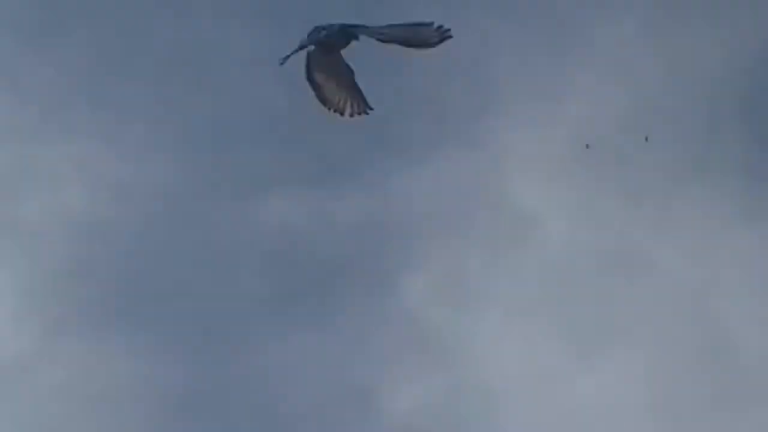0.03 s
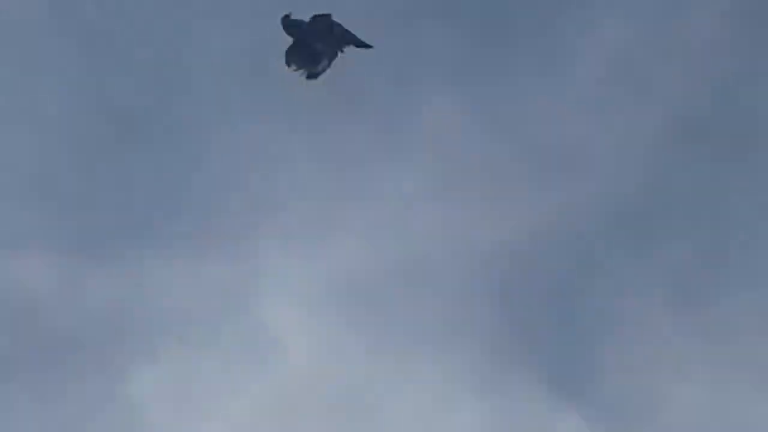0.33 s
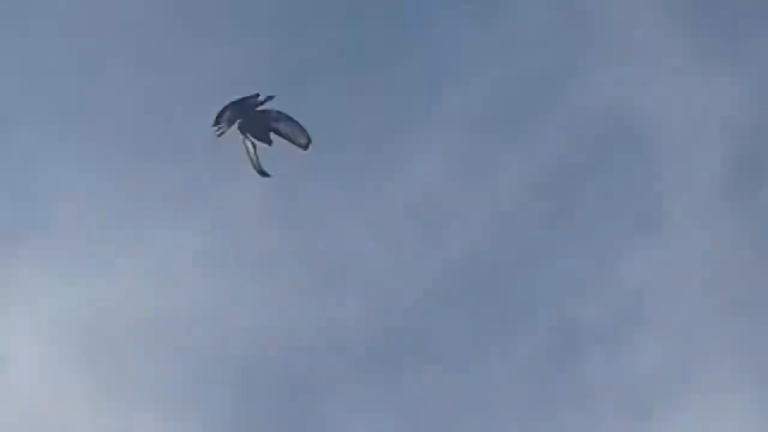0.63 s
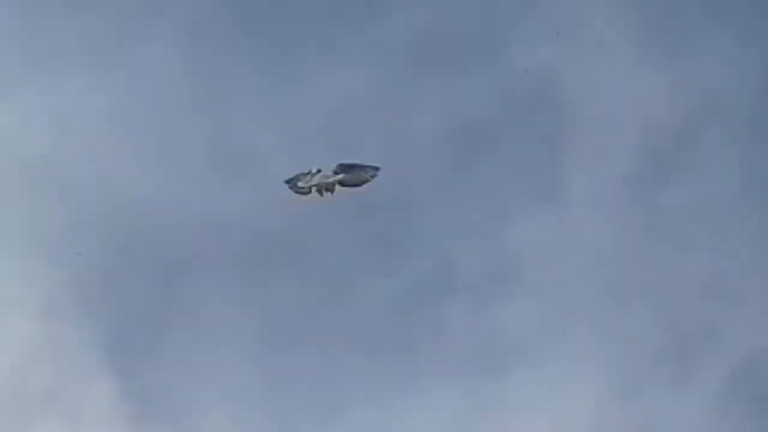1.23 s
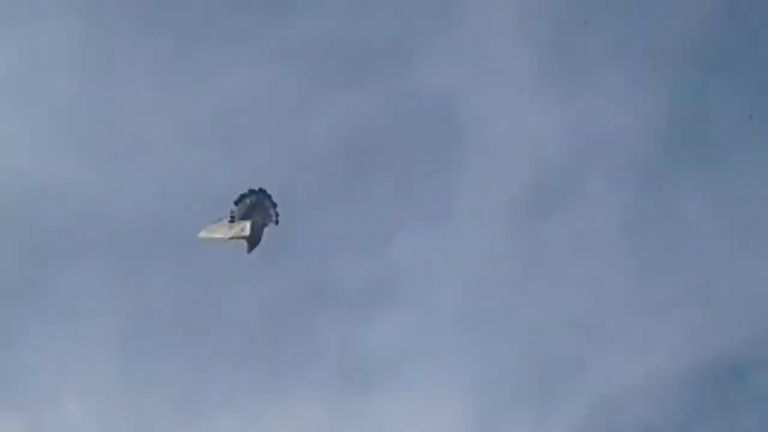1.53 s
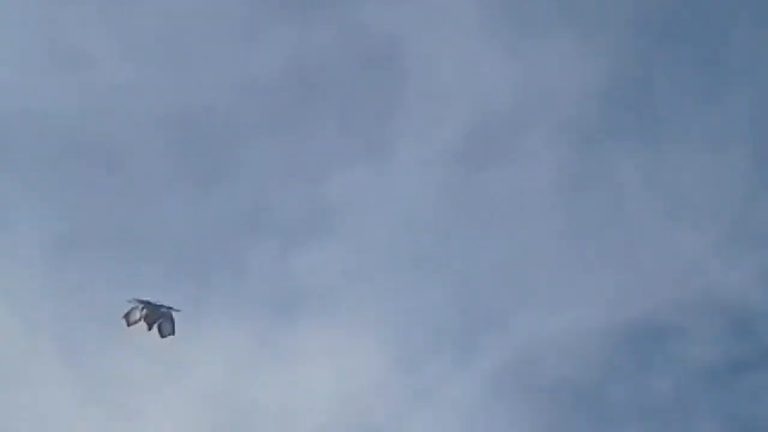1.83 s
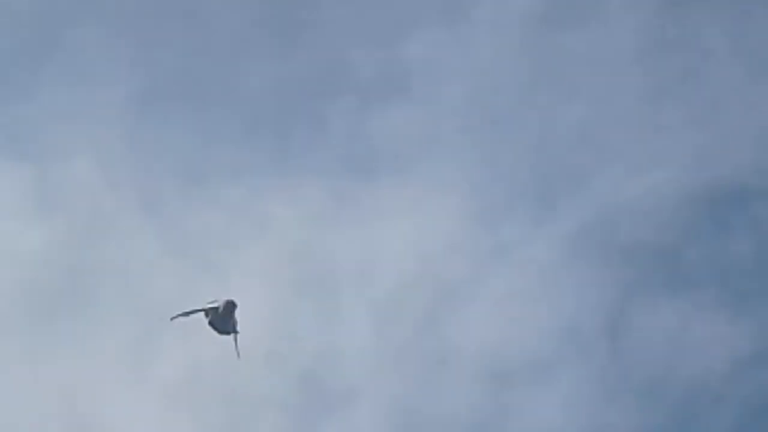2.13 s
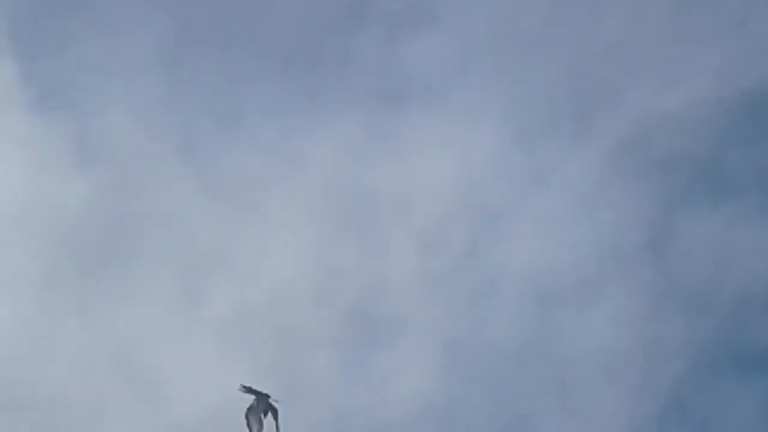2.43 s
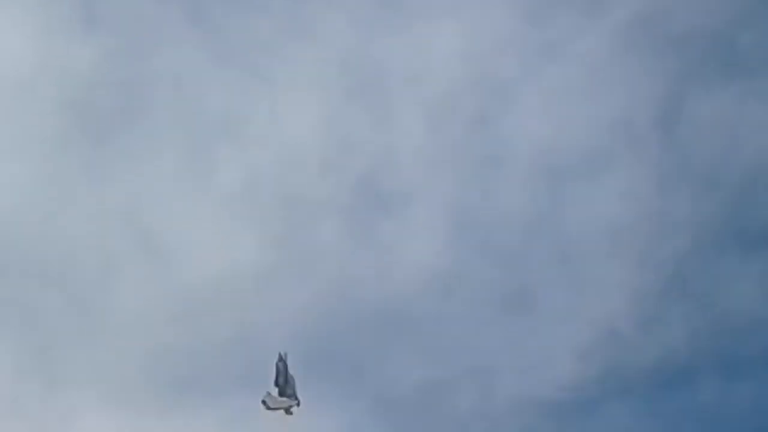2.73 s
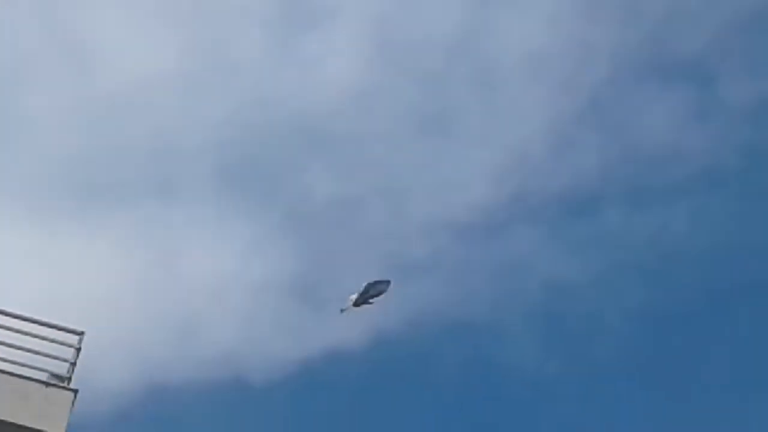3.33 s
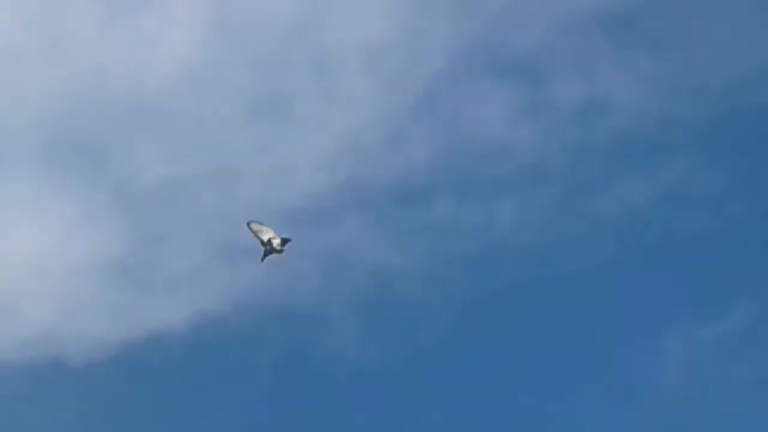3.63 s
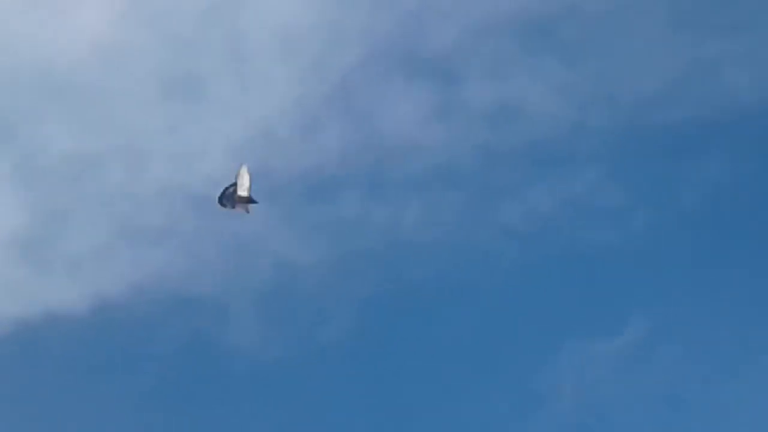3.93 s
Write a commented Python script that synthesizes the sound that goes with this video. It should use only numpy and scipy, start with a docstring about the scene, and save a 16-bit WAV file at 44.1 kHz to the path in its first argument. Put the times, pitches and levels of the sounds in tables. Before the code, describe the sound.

A pigeon flies overhead, its wings swishing and clapping sharply about eight times a second, echoing lightly off yard walls. The claps drop out around 1.5 seconds and again from 2.2 to 2.7, then continue softer until 3.8. Small birds chirp further off, clearest near 0.5, 2 and 2.8 seconds. Underneath are a few soft bumps, a steady hiss and a faint hum that swells from about 3 seconds.

```python
"""Pigeon over a yard

A pigeon passes above the microphone: its wings swish on each stroke and clap at the top of most.
Every clap comes back off the ground and a wall, and a few return from farther walls as faint ticks.
Small birds chirp further off, over a steady outdoor hum and hiss; the hum swells near the end.
A few soft bumps and faint low tones lie underneath."""
import sys
import numpy as np
from scipy import signal
from scipy.fft import rfft, irfft, next_fast_len
from scipy.io import wavfile
from scipy.ndimage import map_coordinates

SR = 44100
rng = np.random.default_rng(int(sys.argv[2]) if len(sys.argv) > 2 else 0)


def wav_record(signal):
    """Record a signal, one row per channel, as 16-bit PCM in the file named by sys.argv[1]."""
    frames = np.transpose(np.atleast_2d(signal))
    bounded = np.clip(frames, -1, 1)
    # unit amplitude maps onto the largest positive 16-bit level
    quanta = np.round(bounded * 32767).astype(np.int16)
    wavfile.write(sys.argv[1], SR, quanta)


N = 4 * SR

# Background level at the microphone: t/s, level/dB
HUM_LEVEL = [(0.0, -59.5), (0.69, -58.5), (0.98, -57), (2.76, -57.5), (2.97, -49.5), (3.66, -47.5),
             (4.0, -47)]
HISS_LEVEL = [(0, -46.5), (.2, -53), (.5, -45.5), (1.0, -44.5), (1.45, -45), (1.7, -47), (2.3, -44),
              (2.56, -48), (3.0, -43), (3.5, -44), (4, -43.5)]
# Background spectra: f/Hz, relative level/dB
HUM_SPECTRUM = [(24, -43), (40, -26), (152, -6.5), (226, -21.5), (302, -2.5), (496, -6), (531, -3),
                (816, 0), (1320, -9), (1560, -5), (2400, -13.5), (3120, -13), (5280, -120)]
HISS_SPECTRUM = [(880,-53), (1500,-21), (2300,-10), (2880,-3), (3600,4.5), (4500,3.5), (5300,1.5), (7170,2),
                 (8740,-18), (16000,-30)]
RUMBLE_SPECTRUM = [(20, -15), (45, -12), (85, -1), (150, -0.5), (260, -2), (600, -23)]
# Soft bumps: centre t/s, middle f/Hz, length/s, level/dB
BUMPS = [(0.476, 125, 0.022, -48.5), (1.48, 153, .05, -51), (1.559, 335, 0.026, -43),
         (2.151, 121.3, 0.042, -42.5)]
# Faint far tones: t/s, length/s, first f/Hz, middle f/Hz, last f/Hz, level/dB
FAR_TONES = [(.53, 0.15, 196, 178.6, 145, -58.5), (.8, 0.17, 156, 176.8, 161, -52.5),
             (1.63, 0.25, 165, 172.5, 148, -57.5), (2.82, 0.67, 502, 500, 492, -56.5)]

# Reverberation time of the yard: f/Hz, T60/s
YARD_T60 = [(200, 0.15), (1500, 0.5), (4000, 0.75), (7000, 0.47), (10000, 0.39), (16000, 0.085)]
# Tone of the echoes off yard, ground and wall: f/Hz, gain/dB
YARD_COLOUR = [(100, -33), (1500, 10), (3800, 0), (5500, 2.5), (7200, 10), (9000, 10), (16000, -2)]
GROUND_COLOUR = [(100, 0), (1500, 2.5), (3600, -0.5), (4500, -4.5), (6000, -4), (7050, 7.5), (8300, 8.5),
                 (10000, 6), (15000, 2.5)]
WALL_COLOUR = [(100, -12), (1500, 9), (4000, 6.5), (7200, 2), (9000, -1.5), (15000, 2)]
# Delay of the ground echo as the pigeon passes: t/s, lag/s
GROUND_LAG = [(1.3, 0.0091), (1.86, 0.0079), (2.16, .008), (3.35, .0065)]

# Small birds' notes: t/s, length/s, first f/Hz, middle f/Hz, last f/Hz, level/dB
CHIRPS = [(.44,0.029,3840,4310,4770,-40.5), (.443,.036,5710,6500,7260,-41), (.474,0.063,2757,4085,4380,-34),
          (0.513,.056,4610,3883,3200,-28), (1.305,.05,5700,5040,4150,-41),
          (1.589,.036,4605,3800,2830,-40.5), (1.735,0.049,4690,4450,4100,-39),
          (1.783,0.049,4020,3630,3340,-43), (1.914,.045,4220,4950,5340,-33.5),
          (1.934,.045,2730,3110,3500,-38.5), (1.966,0.0278,3230,3490,4040,-24.5),
          (1.984,0.035,4010,4056,3870,-17.5), (2.01,.06,4044,3585,2860,-27),
          (2.236,0.029,4900,5090,5500,-32.5), (2.263,0.03,4890,5330,5560,-32.5),
          (2.287,0.0356,3680,4410,3940,-40), (2.367,.032,4210,3710,3220,-34.5),
          (2.611,.04,4350,4560,3800,-42.5), (2.765,0.028,4300,3800,3400,-36),
          (2.797,0.028,2640,2247,1770,-38), (2.83,0.033,4206,4020,3920,-22),
          (2.87,.05,3664,3385,2930,-27.5), (3.108,0.073,3490,3925,3300,-39.5),
          (3.943,0.025,4660,4910,4800,-35)]
# Second harmonic of a rising note: f/Hz, relative level/dB
CHIRP_OVERTONE = [(6000, -12), (7400, -16.5), (9000, -23.5), (10000, -37)]
# A chirp's bounce off the ground, then the wall: lag/s, gain/dB
CHIRP_ECHOES = [(.009, -6), (.03, -7.5)]

# Wing swishes overhead, and faint ticks of claps returning from farther walls (the rows at 1.361,
# 1.491, 2.199 and 2.233 s): peak t/s, relative puff level/dB, hiss level/dB
SWISHES_AND_TICKS = [(.055, -45.5, -47), (0.168, -49.5, -46), (.245, -51.5, -53), (.295, -46, -54),
                     (0.364, -42.5, -59), (0.606, -46.5, -58), (0.663, -42.5, -43), (0.716, -47.5, -52),
                     (0.769, -43.5, -44), (0.834, -48.5, -41), (0.888, -41.5, -38), (0.944, -44, -38),
                     (0.998, -43, -48), (1.064, -47, -40.5), (1.121, -43.5, -44), (1.179, -44.5, -39),
                     (1.244, -41.5, -44), (1.304, -48, -38), (1.361, -48, -42), (1.418, -45, -37),
                     (1.491, -57, -35.5), (1.555, -52.5, -43.5), (1.611, -51.5, -44), (1.736, -47.5, -45),
                     (1.796, -47.5, -42), (1.851, -46, -47), (1.916, -50.5, -41), (1.974, -46, -37),
                     (2.033, -49.5, -38.5), (2.09, -44, -43), (2.156, -43, -53), (2.199, -52, -37.5),
                     (2.233, -56, -35), (2.35, -60, -44), (2.417, -47, -42.5), (2.479, -53.5, -46.5),
                     (2.76, -58, -41.5), (2.814, -51, -35.5), (2.87, -41.5, -32), (3.384, -64, -35),
                     (3.658, -48, -37.5), (3.772, -48, -37)]
# Spectra of their air puff and feather hiss: f/Hz, relative level/dB
PUFF_SPECTRUM = [(40, -29), (110, -19.5), (220, -5), (450, -7.5), (650, -4), (900, 1), (1250, -4.5),
                 (1700, -12), (3000, -6), (8000, -27)]
FEATHER_SPECTRUM = [(500, -38), (2400, -12), (3800, 4), (5500, 1.5), (7200, 6), (8500, -11.5),
                    (11000, -24.5), (16000, -27)]
# Wing claps overhead: t/s, relative level/dB, time the feathers take to meet/s,
# treble tilt/(dB per octave), ground echo gain/dB, wall echo gain/dB, air thump level/dB
CLAPS = [(0.0597,-16.5,0.0068,-1.5,-4.5,-9,-60), (0.1813,-5.5,0.00029,0.6,-6,-12,-53),
         (.306,-8.5,0.00035,0,-1,-12.5,-53), (.37,-7,0.00028,0,-4,-18,-41.5),
         (0.6709,-16.5,0.0011,-1,-12,-16.5,-48), (0.7807,-14,.002,1,-9.5,-17,-51),
         (0.8945,-6.5,.0025,0,-5,-24,-43), (1.0114,-8.5,0.00093,.3,-7.5,-22,-51),
         (1.13,-8,0.0019,0.9,-5.5,-30,-47.5), (1.2506,-5.5,0.0032,0.5,-6,-20,-49),
         (1.3724,-4.5,.002,-1.5,-5.5,-26,-49), (1.4378,-10,0.00065,-5,-6,-22,-44.5),
         (1.8566,-11.5,.0018,2.8,-5,-26,-48), (1.9773,-19.5,.001,3.5,-12,-20,-46.5),
         (2.0968,-9,0.0019,2,-14,-16,-47), (2.162,-10.5,0.00078,-3,-7,-12.5,-50),
         (2.7225,-22.5,.0017,0.5,-10,-14,-64), (2.848,-10.5,.003,-3.5,-8,-14,-45),
         (2.9844,-18.5,.0019,0,-8.5,-10.5,-53), (3.1102,-20,.001,-1,-7,-8,-53),
         (3.2331,-22,.0026,4,-8,-11.5,-48), (3.3522,-11,.0024,-3.5,-3,-23,-51),
         (3.4792,-13.5,0.0017,-3,-6,-19,-62), (3.606,-14.5,.0017,-1.5,-5.5,-24,-40.5),
         (3.7339,-14,0.0019,-2.5,-6,-27,-60), (3.8012,-10,0.00093,-4.5,-7,-27,-52)]
# Spectra of a clap and of the thin shimmer after it: f/Hz, relative level/dB
CLAP_SPECTRUM = [(40, -62), (120, -29), (400, -21.5), (900, -17.5), (1600, -18), (2600, -12.5), (3900, 1.5),
                 (5200, 0), (6300, -2.5), (7200, 2), (8300, -15), (10000, -21.5), (13000, -24),
                 (16000, -23)]
SHIMMER_SPECTRUM = [(5000, -22), (9500, -6), (11500, 10), (16000, -6)]


def amp(db):
    """Decibels to gain."""
    return 10 ** (np.asarray(db) / 20)


def unit_rms(x):
    """Scale to rms 1."""
    return x / np.sqrt(np.mean(x ** 2) + 1e-20)


def unit_energy(x):
    """Scale to total energy 1."""
    return x / np.linalg.norm(x)


def at_hz(points, hz):
    """Read (f/Hz, value) points on a log frequency axis."""
    f, values = np.transpose(points)
    return np.interp(np.log(hz + 1), np.log(f + 1), values)


def curve(points):
    """Spread (t/s, value) points to one value per sample."""
    return np.interp(np.arange(N) / SR, *np.transpose(points))


def wobble(rate):
    """A smooth random curve, rate knots a second."""
    return map_coordinates(rng.standard_normal(int(N * rate / SR) + 4), [np.arange(N) * rate / SR])


def filtered(x, response):
    """Filter x by a gain given as a function of frequency."""
    size = next_fast_len(N + SR // 2)
    return irfft(rfft(x, size) * response(np.fft.rfftfreq(size, 1 / SR)), size)[:N]


def noise(spectrum):
    """Coloured noise of rms 1."""
    return unit_rms(filtered(rng.standard_normal(N), lambda hz: amp(at_hz(spectrum, hz))))


def colour(x, points, tilt_db=0, size=2048):
    """Causal filter through (f/Hz, gain/dB) points, with a tilt per octave in the treble."""
    hz = np.fft.rfftfreq(size, 1 / SR)
    db = at_hz(points, hz) + tilt_db * np.log2(np.maximum(hz, 1000) / 4000)
    cepstrum = irfft(np.log(amp(db)))
    cepstrum[1:size // 2] *= 2  # fold to minimum phase
    cepstrum[size // 2 + 1:] = 0
    return signal.fftconvolve(x, irfft(np.exp(rfft(cepstrum))))[:len(x)]


def add(out, start, x):
    """Mix x into out, start seconds in."""
    i = max(0, round(start * SR))
    out[i:i + len(x)] += x[:max(0, len(out) - i)]


def arch(length, first_hz, middle_hz, last_hz):
    """Pitch and envelope of a note that bends through three pitches as it swells and fades."""
    progress = np.linspace(0, 1, int(length * SR))
    parabola = np.polyfit([0, 0.5, 1], [first_hz, middle_hz, last_hz], 2)
    return np.polyval(parabola, progress), np.sin(np.pi * progress)


def yard_echo(x, decay_scale=1):
    """Diffuse echo of x off the buildings around the microphone."""
    hz, t, spectrogram = signal.stft(rng.standard_normal(SR // 2), SR, nperseg=256)
    decay_db = 60 * t / (decay_scale * at_hz(YARD_T60, hz)[:, None])
    build_up = 1 - np.exp(-t / 0.014)
    envelope = amp(at_hz(YARD_COLOUR, hz)[:, None] - decay_db) * build_up
    tail = signal.istft(spectrogram * envelope, SR)[1]
    return signal.fftconvolve(x, unit_energy(tail))


def outdoor_ambience():
    """The bed of the place: a distant traffic-like hum, low rumble and airy hiss."""
    hum = amp(curve(HUM_LEVEL) + 1.5 * wobble(10)) * noise(HUM_SPECTRUM)
    rumble = amp(-64 + 1.5 * wobble(4.2)) * noise(RUMBLE_SPECTRUM)
    hiss = amp(curve(HISS_LEVEL) + 0.67 * wobble(29.87)) * noise(HISS_SPECTRUM)
    return hum + rumble + hiss


def bumps_and_tones():
    """Soft dull bumps and faint far tones, each a low gliding sine."""
    out = np.zeros(N)
    bumps = [(centre - length / 2, length, 1.63 * hz, hz, 1.13 * hz, db)
             for centre, hz, length, db in BUMPS]
    for start, length, *pitches, db in bumps + FAR_TONES:
        hz, swell = arch(length, *pitches)
        add(out, start, amp(db) * swell * np.sin(2 * np.pi * np.cumsum(hz) / SR))
    return out


def far_twitter(count=34, length=0.032, fall=0.123):
    """Short falling notes from the farthest birds, loosely spaced, as rows like CHIRPS."""
    rows = []
    for k, (jitter, pitch, level) in enumerate(rng.uniform(-0.66, 1, (count, 3))):
        start = (k + 0.5 + jitter / 2) / count * N / SR
        hz = 4290 * np.exp(0.3 * pitch)
        rows.append((start, length, hz * (1 + fall / 2), hz, hz * (1 - fall), -52 + 3 * level))
    return rows


def small_birds(waver_depth=0.008, rough_db=3.5, near_db=-20):
    """Birds some way off call in wavering, raspy notes, returned by ground, wall and yard."""
    out, waver, rough = np.zeros(N), wobble(250), wobble(300)
    scatter = wobble(800) + 1j * wobble(800)
    for start, length, first_hz, middle_hz, last_hz, db in CHIRPS + far_twitter():
        hz, swell = arch(length, first_hz, middle_hz, last_hz)
        span = (int(start * SR) + np.arange(len(hz))) % N
        phase = 2 * np.pi * np.cumsum(hz * (1 + waver_depth * waver[span])) / SR
        rasp_depth = amp(-16 + 0.4 * (near_db - db))  # fainter, farther chirps arrive more scattered
        rasp = (1 + rasp_depth * scatter[span]) / np.sqrt(1 + 2 * rasp_depth ** 2)
        overtone_db = at_hz(CHIRP_OVERTONE, 2 * hz) - 11 * (last_hz < first_hz)  # weaker if falling
        whistle = np.exp(1j * phase) + amp(overtone_db) * np.exp(2j * phase)
        note = amp(db + rough_db * rough[span]) * swell * np.real(rasp * whistle)
        add(out, start, note)
        for lag, echo_db in CHIRP_ECHOES:
            add(out, start + lag, amp(echo_db) * note)
        add(out, start, amp(-7) * yard_echo(note, decay_scale=0.48))
    return out


def swishes_and_ticks(hiss_rise_s=0.0089, hiss_fall_s=0.014, flutter_db=4.5):
    """Wings swish with a puff of air and fluttering hiss; like bursts serve as far walls' clap echoes."""
    t, puff_envelope, hiss_envelope = np.arange(N) / SR, np.zeros(N), np.zeros(N)
    for peak, air_db, hiss_db in SWISHES_AND_TICKS:
        offset = (t - peak) / np.where(t < peak, hiss_rise_s, hiss_fall_s)
        puff_envelope += amp(air_db + 0.5) * np.exp(1 - np.hypot(1, offset / 0.71))  # the briefer one
        hiss_envelope += amp(hiss_db) * np.exp(1 - np.hypot(1, offset))
    air = noise(PUFF_SPECTRUM)
    hiss = unit_rms(noise(FEATHER_SPECTRUM) * amp(flutter_db * wobble(500)))
    return puff_envelope * air + hiss_envelope * hiss


def wing_contact(t, spread_s, later_slaps=5, rustle_t60=0.019):
    """The wing tips meet: one slap, more feathers landing within spread_s, and the vanes' rustle."""
    slaps = np.zeros(len(t))
    slaps[0] = 1
    slap_times = (np.arange(later_slaps) + rng.random(later_slaps)) / later_slaps * spread_s
    strengths = amp(-0.5) * min(spread_s / 0.0017, 2) * rng.standard_normal(later_slaps)
    np.add.at(slaps, (slap_times * SR).astype(int), strengths)
    rustle = rng.standard_normal(len(t)) * amp(-60 * t / rustle_t60)
    return unit_energy(slaps) + amp(-1.5) * unit_energy(rustle)


def shimmer(t, t60=0.21, grain_db=4, grain_rate=450):
    """The thin, grainy top end that hangs on after a clap."""
    grains = rng.standard_normal(len(t)) * amp(grain_db * wobble(grain_rate)[:len(t)] - 60 * t / t60)
    return unit_energy(colour(grains, SHIMMER_SPECTRUM))


def wing_claps(gain_db=11.5, thump_hz=140, thump_rise_s=0.005, wall_lag_s=0.0316):
    """The wings clap above the microphone and squeeze out a thump of air; ground, wall and yard answer."""
    out, t = np.zeros(N), np.arange(SR // 8) / SR
    thump_envelope = (t / thump_rise_s * np.exp(1 - t / thump_rise_s)) ** 2
    thump = thump_envelope * np.sin(2 * np.pi * thump_hz * t)
    for start, db, spread_s, tilt_db, ground_db, wall_db, thump_db in CLAPS:
        gain = amp(db + gain_db)
        clap = gain * unit_energy(colour(wing_contact(t, spread_s), CLAP_SPECTRUM, tilt_db))
        bounce = colour(clap, GROUND_COLOUR)
        ground_lag_s = np.interp(start, *np.transpose(GROUND_LAG))
        add(out, start, clap + amp(thump_db) * thump + gain * amp(-24) * shimmer(t))
        add(out, start + ground_lag_s, amp(ground_db) * bounce)
        add(out, start + wall_lag_s, amp(wall_db) * colour(bounce, WALL_COLOUR))
        add(out, start, amp(-11.5) * yard_echo(clap))
    return out


def scene():
    """One microphone in the yard: pigeon overhead, small birds further off, ambience behind."""
    pigeon = wing_claps() + swishes_and_ticks()
    return (pigeon + small_birds() + bumps_and_tones() + outdoor_ambience())[None]


def record(dry):
    """The microphone chain cuts off steeply at the top of its band."""
    top_hz, edge_hz = 16000, 90
    return np.array([filtered(x, lambda hz: 1 / (1 + np.exp((hz - top_hz) / edge_hz))) for x in dry])


dry = scene()
out = record(dry)
wav_record(out)
```